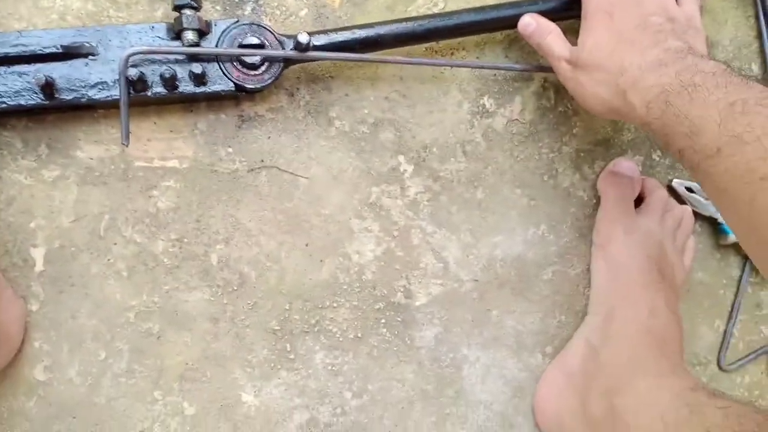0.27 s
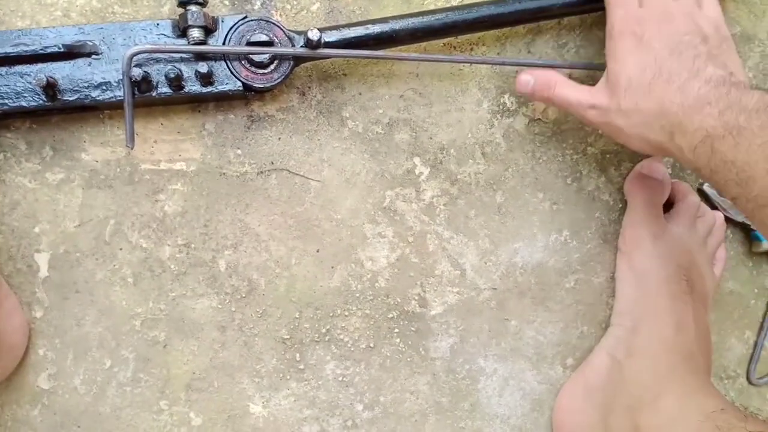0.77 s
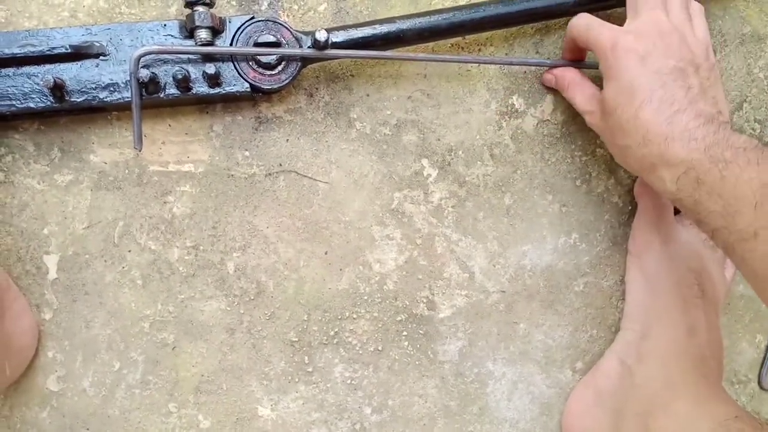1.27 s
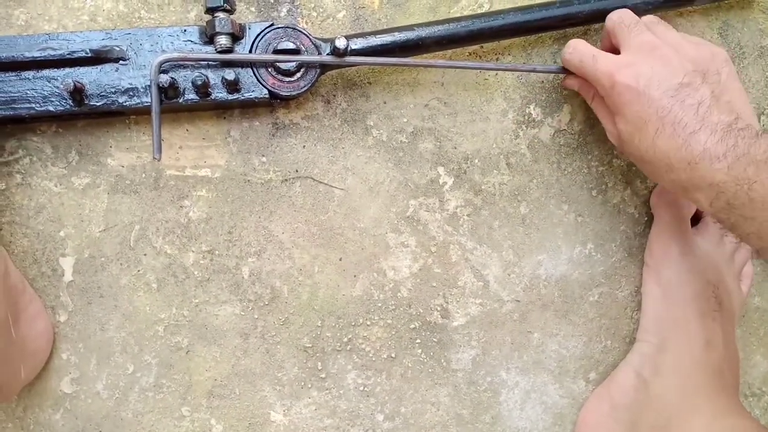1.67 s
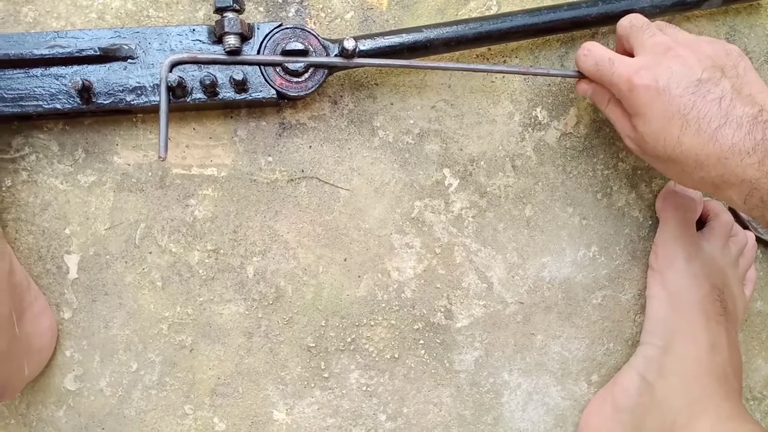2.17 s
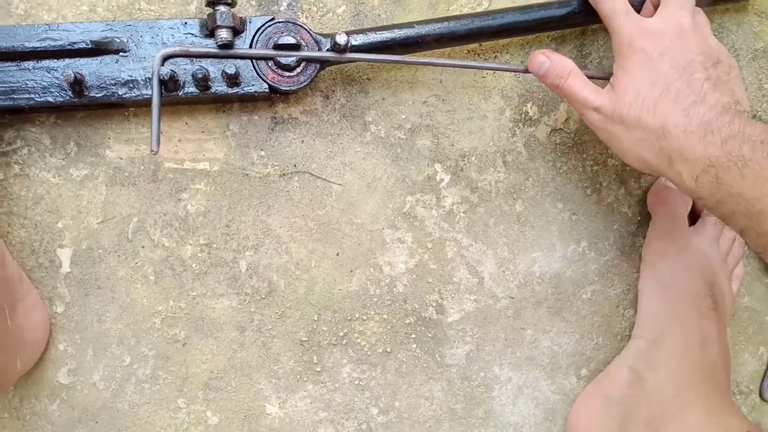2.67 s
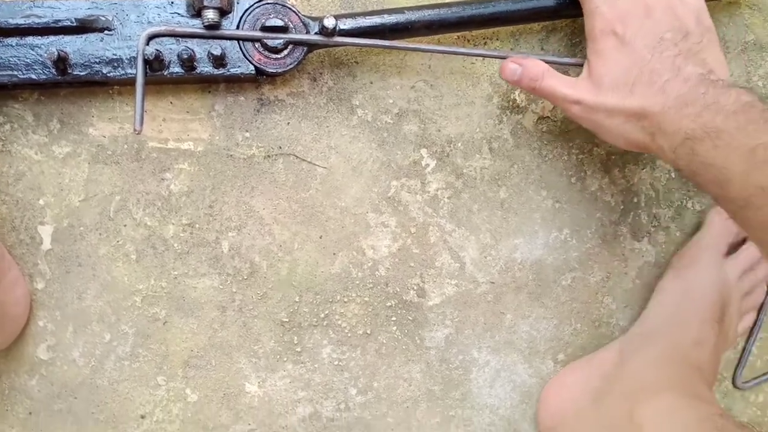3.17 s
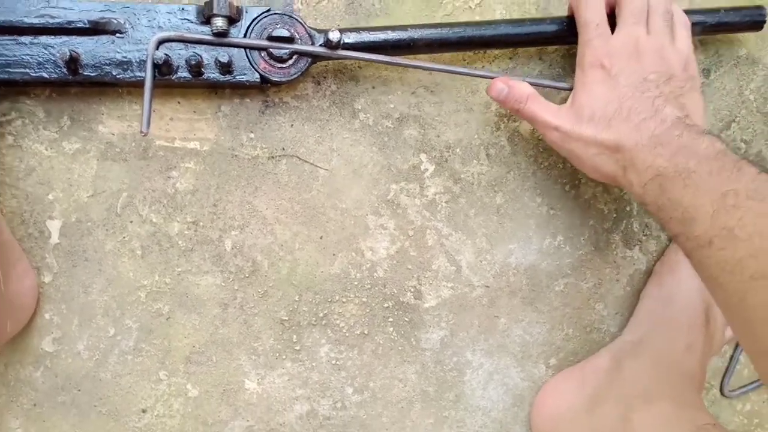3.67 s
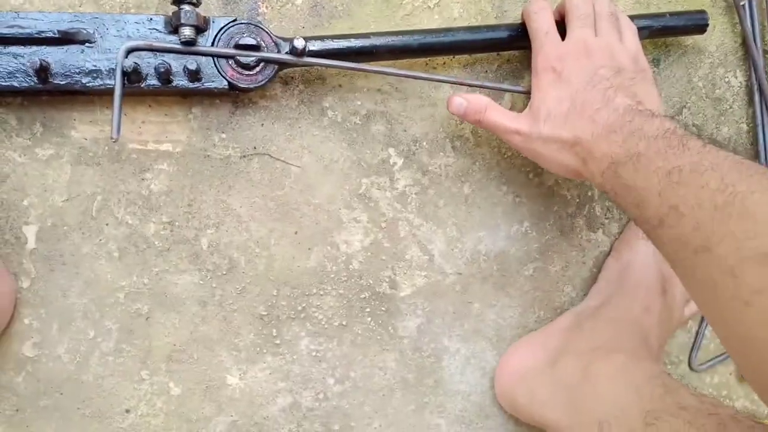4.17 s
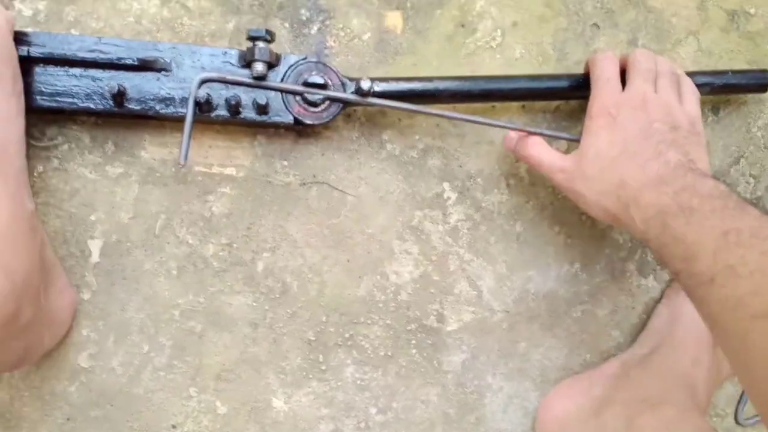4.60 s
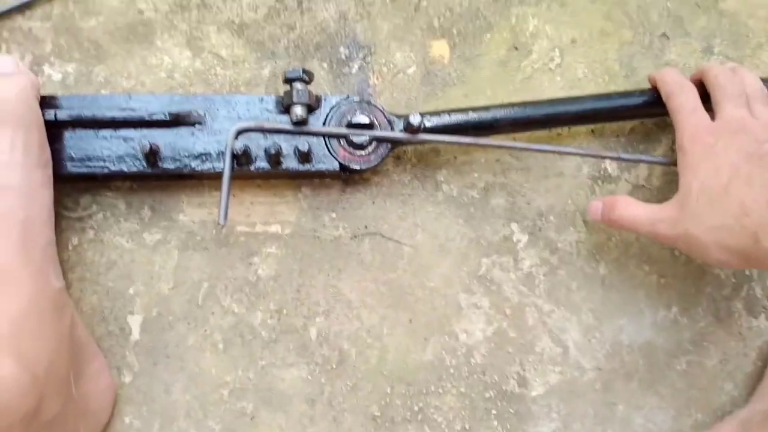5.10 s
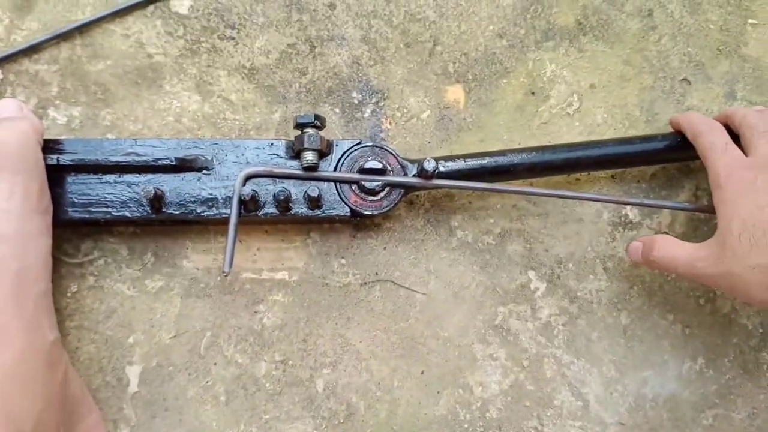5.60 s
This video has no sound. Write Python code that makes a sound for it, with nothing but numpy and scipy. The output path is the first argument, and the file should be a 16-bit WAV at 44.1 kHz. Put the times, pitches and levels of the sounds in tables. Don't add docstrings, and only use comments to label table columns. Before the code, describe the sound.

A thin steel rod knocks and rattles in a heavy metal bending jig, with one loud clang, gritty scuffs and a brief squeak.

```python
import sys
import numpy as np
from scipy import signal
from scipy.fft import rfft, irfft, next_fast_len
from scipy.io import wavfile
from scipy.ndimage import uniform_filter1d

SR = 44100
rng = np.random.default_rng(int(sys.argv[2]) if len(sys.argv) > 2 else 0)


def boost_factor(decibels):
    exponent = np.asarray(decibels, float) / 20
    return 10 ** exponent


def waveform_to_disk(signal):
    frames = np.transpose(np.atleast_2d(signal))
    scaled = np.clip(frames, -1, 1) * 32767
    samples = np.round(scaled).astype(np.int16)
    wavfile.write(sys.argv[1], SR, samples)


N = 257746
T = np.arange(N) / SR


def rms_one(x):
    return x / np.sqrt(np.mean(x ** 2) + 1e-20)


def at_hz(points, hz):
    points_hz, values = np.transpose(points)
    return np.interp(np.log(hz), np.log(points_hz), values)


def coloured(x, spectrum):
    size = next_fast_len(len(x))
    hz = np.fft.rfftfreq(size, 1 / SR) + 1
    shaped = rfft(x, size) * boost_factor(at_hz(spectrum, hz))
    return rms_one(irfft(shaped, size)[:len(x)])


def drift(rate):
    r = np.exp(-80 * np.pi * rate / SR)
    noise = rng.standard_normal(N // 40 + 2002)
    slow = signal.lfilter([1], [1, -2 * r, r * r], noise)[2000:]
    return np.interp(np.arange(N) / 40, np.arange(len(slow)), rms_one(slow))


def glide(hz):
    return 2 * np.pi * np.cumsum(hz) / SR


def air(patchy_db=.4):
    # frequency in Hz, level in dB per Hz.
    murmur_colour = [(15, -43), (25, -18.5), (43, -17.5), (79, -9), (133, -3), (191, -7.5), (439, -10.5),
                     (526, -12.5), (602, -14), (826, -13), (1060, -16), (3830, -22), (5500, -35.5),
                     (7150, -68), (12100, -120)]
    # frequency in Hz, level in dB per Hz.
    hiss_colour = [(2940, -32), (5000, -11.5), (5580, -8.5), (5850, -4.5), (7230, -8), (8380, 2.5),
                   (10900, -10.5), (11800, -9), (15500, -10.5)]
    murmur = coloured(rng.standard_normal(N), murmur_colour)
    hiss = coloured(rng.standard_normal(N), hiss_colour)
    murmur_gain = boost_factor(-60.5 - 4.0 + patchy_db * drift(1.0))
    return murmur_gain * murmur + boost_factor(-77.5 + patchy_db * drift(2.6)) * hiss


def hum(waver_hz=1.22, waver_db=2.2):
    # frequency in Hz, level in dB rms.
    motor_lines = [(96.9, -68.5), (145.3, -69), (339.1, -87), (532.9, -67.5), (721.4, -77), (769.8, -77.5),
                   (818.3, -75.5), (866.7, -79), (915.2, -87)]
    out = np.zeros(N)
    for hz, db in motor_lines:
        gain = np.sqrt(2) * boost_factor(db + waver_db * drift(2.7))
        out += gain * np.sin(glide(hz + waver_hz * drift(4)))
    return out


def insect(buzz_hz=3, throb_db=1.5, beats_per_s=58, beat_depth=1.2):
    # centre in seconds, half width in seconds, level in dB rms.
    swells = [
        (.6, .8, -87.5),
        (2.4, 1, -85.5),
        (4.95, .35, -86),
        (5.7, .3, -89),
    ]
    swell = sum(boost_factor(db) * np.exp(-((T - s) / width) ** 2) for s, width, db in swells)
    beats = 1 + beat_depth * np.cos(2 * np.pi * beats_per_s * T)
    hz = 4490 + 11 * T + buzz_hz * drift(6)
    return np.sqrt(2) * swell * beats * boost_factor(throb_db * drift(8)) * np.sin(glide(hz))


def bird(start_s=5.715, top_s=5.787, top_hz=10570, bend_hz_per_s2=340000, under_db=-5):
    hz = np.maximum(top_hz - bend_hz_per_s2 * (T - top_s) ** 2, 0)
    upper_voice = np.sin(glide(hz))
    lower_voice = boost_factor(under_db + 3 * drift(30)) * np.sin(glide(.905 * hz))
    gain = boost_factor(-84.5 + 3 * drift(25)) * np.clip((T - start_s) / .01, 0, 1)
    return np.sqrt(2) * gain * (upper_voice + lower_voice)


def room(x, tail_db=-5, build_s=0.014):
    # delay in seconds, level in dB.
    echoes = [(.0125, -5), (.021, -7), (.031, -10), (.043, -11), (.061, -13)]
    # frequency in Hz, t60 in seconds.
    decay = [(200, 0.75), (1000, 0.5), (3000, 0.66), (6000, 0.45), (9500, 0.62), (12500, 0.16),
             (15000, 0.16)]
    t, tail = np.arange(SR) / SR, 0
    edges = 100 * 2 ** np.arange(0, 7.6, .5)
    for low, high in zip(edges, edges[1:]):
        band_pass = signal.butter(2, [low, high], "band", fs=SR, output="sos")
        band = signal.sosfilt(band_pass, rng.standard_normal(SR))
        tail = tail + band * boost_factor(-60 * t / at_hz(decay, np.sqrt(low * high)))
    tail = tail * (1 - np.exp(-t / build_s))
    response = boost_factor(tail_db) * tail / np.sqrt(np.sum(tail ** 2))
    for delay, db in echoes:
        response[round(delay * SR)] += boost_factor(db)
    return signal.fftconvolve(x, response)[:N]


def stroke(s, length, db):
    rise_share, fade_db = 0.25, 28
    away = np.maximum((s - T) / rise_share, (T - s) / (1 - rise_share)) / length
    return boost_factor(db - fade_db * np.minimum(away, 5))


def scuffs(flicker_db=-2.5):
    # loudest moment in seconds, length in seconds, rasp level in dB,
    # dry hiss over rasp in dB, weight as rumble over rasp in dB.
    slides = [(0.015, 0.33, -59, 3.5, -6), (0.18, 0.14, -75, 6, -15), (0.841, 0.14, -74.5, 6, -4),
              (1.113, 0.54, -83.5, 8, 8), (1.64, 0.85, -79, 1, -1), (1.89, 0.11, -59.5, -14, -11),
              (2.266, 0.13, -65, -1, -7), (2.633, 0.3, -68, -3.5, -4.5), (2.836, 0.17, -74.5, 2, -15),
              (3.036, 0.55, -66.5, 5, -4.5), (4, 0.28, -78.5, -26, 15.5), (4.086, 0.46, -69, 0.5, 7.5),
              (5.547, 0.2, -79.5, -15, 19), (5.643, .2, -82.5, -11.5, 20)]
    drags = [(1.98, 0.041, -46, -15, -14), (2.0, 0.22, -56, -30, 6.5), (3.155, 0.1, -72.5, 6, -7),
             (3.189, 0.097, -56.5, 11, 1.5), (3.25, 0.4, -63.5, 2, -3.5), (3.335, 0.2, -64.5, 14, -2),
             (3.472, 0.13, -46, -4.5, -3.5), (3.71, 0.075, -69, 6.5, 11), (3.758, 0.19, -41.5, -8.5, -6),
             (3.789, 0.05, -48.5, -3, 2.5), (3.85, 0.14, -70, -23, 11), (4.443, 0.08, -44.5, 6, -7.5),
             (4.465, 0.043, -52.5, -0.5, -3)]
    # frequency in Hz, level in dB per Hz.
    hiss = [(3500, -40), (5000, -15), (6200, -12), (7500, -7), (8800, 0), (10000, -6), (11500, -15),
            (15500, -20)]
    rasp = [(600, -28.5), (950, -10.5), (1400, -0.5), (1800, -4), (2600, -7.5), (3300, -4.5), (4500, -12.5),
            (6000, -39)]
    rumble = [(120, -17.5), (220, 0.5), (350, 5), (700, 0), (1000, -2), (1400, -42.5)]
    sizes = boost_factor(3.5 * np.minimum(rng.exponential(1, N), 3.5)) * rng.choice([-1, 1], N)
    grains = (rng.random(N) < 2000 / SR) * sizes
    grit = rms_one(grains) + .6 * rng.standard_normal(N)
    levels = np.zeros((3, N))
    for s, length, db, dry_db, weight_db in [*slides, *drags]:
        balance = boost_factor([[dry_db], [0], [weight_db]])
        levels += balance * stroke(s, length, db)
    out = np.zeros(N)
    for level, colour in zip(levels, (hiss, rasp, rumble)):
        out += uniform_filter1d(level, size=150) * coloured(grit, colour)
    return boost_factor(-2.0 + flicker_db * drift(30)) * out


def brush():
    # loudest moment in seconds, length in seconds, level in dB.
    whisks = [
        (.85, .1, -72),
        (2.267, .12, -65),
    ]
    # frequency in Hz, level in dB per Hz.
    whisk_colour = [(9000, -30), (11500, -8), (14000, -8), (15800, -4)]
    gain = sum(stroke(*row) for row in whisks)
    return gain * coloured(rng.standard_normal(N), whisk_colour)


def squeak(jitter=0.0014):
    # time in seconds, level in dB.
    pressure = [
        (4.426, -58),
        (4.433, -21),
        (4.4375, -14),
        (4.441, -22),
        (4.444, -9),
        (4.448, -6.5),
        (4.452, -9),
        (4.455, -22),
        (4.459, -55),
    ]
    # multiple of the slip rate, level in dB.
    overtone_levels = [(2, -6.5), (3, -6), (4, -29.5), (5, -47.5)]
    slip_s, slip_glide_s = 4.4398, .003
    grip_hz, slid_hz = 3255, 3130
    gain = boost_factor(np.interp(T, *np.transpose(pressure), left=-130, right=-130))
    hz = slid_hz + (grip_hz - slid_hz) * (1 - np.tanh((T - slip_s) / slip_glide_s)) / 2
    harsh_db = 6.5 - np.maximum(2499 * (slip_s - T), 1500.5 * (T - slip_s))
    phase = glide(hz * (1 + jitter * drift(300)))
    overtones = sum(boost_factor(db + harsh_db) * np.sin(round(k) * phase) for k, db in overtone_levels)
    return gain * np.sin(phase), gain * overtones


def heel_plate(struck_s=4.4495, enter_s=4.4545, fade_in_s=0.003):
    # frequency in Hz, level in dB, t60 in seconds.
    plate_modes = [(3087, -19, 0.54), (3097, -25.5, 0.33), (3175, -29.5, .5), (3198, -19, 0.42),
                   (3249, -25.5, .55), (3300, -32, .4)]
    t = np.maximum(T - struck_s, 0)
    rings = sum(boost_factor(db - 60 * t / t60) * np.sin(2 * np.pi * hz * t) for hz, db, t60 in plate_modes)
    return rings * np.clip((T - enter_s) / fade_in_s, 0, 1)


def ticks(attack_s=.0015):
    # start in seconds, peak level in dB, frequency in Hz, t60 in seconds.
    creeps = [(3.164, -55, 3040, 0.041), (3.169, -55, 3650, .05), (3.186, -55, 1405, 0.032),
              (3.200, -52, 1300, .03), (3.207, -46, 1116, 0.045), (3.214, -50, 1650, 0.037),
              (3.234, -51, 1060, 0.032), (3.235, -60, 1820, 0.035), (3.246, -56, 1090, 0.046),
              (3.247, -60.5, 3650, 0.072), (3.285, -45, 3490, 0.074), (3.294, -44, 3260, 0.065),
              (3.303, -49, 1070, 0.033), (3.302, -51, 1520, 0.037), (3.334, -44.5, 1140, 0.031),
              (3.42, -47, 1395, 0.065), (3.423, -52, 1950, 0.059), (3.423, -52.5, 930, 0.094),
              (3.424, -51, 3780, 0.046), (3.703, -47.5, 1350, 0.057), (3.727, -47, 1250, 0.037),
              (3.739, -48, 3300, .08), (3.744, -38, 1235, .06), (3.751, -43, 3300, 0.073),
              (3.757, -39, 2080, 0.041), (3.785, -29.5, 1400, 0.085)]
    out, t = np.zeros(N + SR), np.arange(SR // 5) / SR
    for s, db, hz, t60 in creeps:
        gain = boost_factor(db - 60 * t / t60) * np.minimum(t / attack_s, 1)
        out[round(s * SR):][:len(t)] += gain * np.sin(2 * np.pi * hz * t)
    return out[:N]


def knocks(hits, modes, crack_db, crack_t60, split_hz=14, twin_db=-4, knee_hz=0, held_s=1, alternate_signs=False):
    # frequency in Hz, level in dB per Hz.
    crack_colour = [(150, -70), (300, -16), (500, -17), (1300, 2), (3500, 0), (6000, -19.5), (8800, 4.5),
                    (12000, -18.5), (15500, -25)]
    out, t = np.zeros(N + SR), np.arange(SR // 3) / SR
    hz, level_db, t60 = np.transpose(modes)[:, :, None]
    sides = (-1.) ** np.arange(len(hz))[:, None] if alternate_signs else 1
    for s, peak_db, hardness, ring in hits:
        tilt_db = hardness * np.log2(np.maximum(hz, knee_hz) / 2000)
        strength = boost_factor(level_db + tilt_db + 1.5 * rng.standard_normal(hz.shape))
        twin_hz = hz + split_hz * np.sqrt(hz / 2000) * rng.standard_normal(hz.shape)
        pair = np.sin(2 * np.pi * hz * t) + boost_factor(twin_db) * np.sin(2 * np.pi * twin_hz * t)
        decay = boost_factor(-60 * t / (np.minimum(t60, .5) * ring))
        rings = (strength * decay * pair * sides).sum(axis=0)
        rings = rings * boost_factor(-500 * np.clip(t - held_s, 0, .03))
        colour = [(f, db + hardness * np.log2(max(f, 600, knee_hz) / 2000)) for f, db in crack_colour]
        crack = coloured(rng.standard_normal(len(t)), colour) * boost_factor(crack_db - 60 * t / crack_t60)
        blow = (rings / np.abs(rings).max() + crack) * np.minimum(t / 0.0009, 1)
        out[round(s * SR):][:len(t)] += boost_factor(peak_db + 0.5) * blow
    return out[:N]




def taps():
    tap_hits = [
        (1.04, -51, -10, 0.62),
        (1.386, -31, -9.5, 0.63),
        (1.403, -35, -19, 0.58),
        (1.441, -43, -7, 0.73),
        (1.893, -60, 4, 0.3),
        (2.657, -51, -2, 0.91),
    ]
    tap_modes = [(1110, -9, .2), (1330, -2, .06), (1385, 2, .15), (1480, -3, .07), (1640, -13, .2),
                 (1930, -9, .15), (2210, -8, .15), (2450, -12, .05), (2790, -15, .15), (3700, -18, .05),
                 (5200, -11, .08), (5900, -17, .05), (8500, -24, .05)]
    return knocks(tap_hits, tap_modes, crack_db=-21.0, crack_t60=0.095, knee_hz=3000)


def nudge():
    nudge_hits = [
        (1.508, -23, 0, 0.63),
        (1.515, -28, 0, 0.41),
    ]
    nudge_modes = [(870, -18, 0.18), (1120, -16, 0.24), (1370, -8, 0.066), (1400, 3.5, 0.095),
                   (1493, 1, 0.29), (1627, -5.5, .25), (1930, -10, 0.1), (2213, -7, 0.19),
                   (2520, -16, 0.33), (2710, -12, 0.19), (2840, -14, .14), (3090, -19, .08),
                   (3413, -12.5, 0.1), (3930, -13, .11), (4070, -20, 0.065), (4530, -26, .1),
                   (5050, -23, .08), (5450, -25, .12), (6767, -27, .1), (8700, -32, .1)]
    return knocks(nudge_hits, nudge_modes, crack_db=-32.5, crack_t60=0.022, twin_db=-6)


def tip():
    tip_hits = [
        (3.1645, -49, -1, 0.39),
        (3.1878, -41, -1, 0.88),
        (3.207, -44, -1, 0.72),
    ]
    tip_modes = [(7397, -24, 5.0), (8048, -31, 5.0), (8600, 1, 0.33), (8700, 9, 0.11), (10130, -14, 0.13),
                 (10400, -13, 0.12), (11890, -24, 0.27), (13310, -46, 5.0), (14320, -17, 0.17),
                 (14670, -37, 5.0)]
    return knocks(tip_hits, tip_modes, crack_db=-18.0, crack_t60=0.029)


def frame():
    frame_hits = [
        (3.279, -26, 10, 0.6),
        (3.467, -20.5, -1.5, 0.54),
        (3.487, -36, -15, 0.87),
        (3.511, -43, 8, 0.67),
    ]
    frame_modes = [(930, -8, .06), (1150, -9, .05), (1330, -2, .05), (1430, 0, .07), (1560, -5, .05),
                   (1950, -5, .05), (2200, -10, .05), (2800, -9, .06), (3300, -10, .1), (3780, -4, .045),
                   (8200, -18, .1), (8800, -14, .1), (9700, -20, .07)]
    return knocks(frame_hits, frame_modes, crack_db=-24, crack_t60=0.03)


def seat():
    seat_hits = [
        (3.745, -41.5, -0.34, 0.75),
        (3.7575, -33.5, -0.24, 0.62),
        (3.769, -34.5, -2.6, 1),
        (3.776, -39.5, -2, 0.4),
        (3.785, -31.5, -1, 0.42),
        (3.791, -29.5, -1, 0.61),
        (3.807, -33, -1.4, 1),
    ]
    seat_modes = [(500, -10, .06), (1180, -7, .06), (1330, 2, .08), (1400, 4, .18), (1500, -6, .06),
                  (1720, -12, .2), (2060, -5, .05), (2450, -13, .1), (2750, -15, .12), (3130, -10, .35),
                  (3240, -4, .45), (3330, -5, .3), (3850, -10, .25), (4340, -17, .2), (8240, -18, .15),
                  (8700, -16, .15), (9050, -13, .15), (9800, -21, .12)]
    return knocks(seat_hits, seat_modes, crack_db=-19, crack_t60=0.047, alternate_signs=True)


def handle():
    handle_hits = [
        (2.003, -9, 1, 0.68),
    ]
    handle_modes = [(856, -15, .2), (1312, -1, .2), (1350, 2, .07), (1463, -9, .25), (1544, -4, .25),
                    (1562, -8, .25), (2291, -11, .2), (1950, -14, .15), (1389, -4, .3), (1486, 1, .38),
                    (1637, -3, .33), (2180, -5, .18), (2207, -11, .25), (2649, -7, .17), (2681, -4, .24),
                    (2977, -15, .28), (3402, -3, .12), (3410, -13, .3), (3989, -12, .25), (4124, -18, .3),
                    (5050, -26, .4), (4640, -22, .15), (5303, -26, .08), (6150, -30, .2), (6500, -29, .2),
                    (6998, -21, .15), (8400, -16, .2), (9300, -14, .2), (9650, -16, .2), (7294, -27, .4),
                    (7892, -23, .4), (8527, -10, .4), (8635, -16, .33), (8861, -8, .19), (9065, -11, .25),
                    (9189, -15, .35), (9518, -8, .2), (10140, -28, .4), (10700, -20, .2), (12020, -32, .3),
                    (13250, -35, .3)]
    return knocks(handle_hits, handle_modes, crack_db=-13.5, crack_t60=0.052, knee_hz=3450,
                  split_hz=7.9, twin_db=3, held_s=.117)


def rod():
    rod_hits = [
        (3.279, -31, 1, 0.29),
        (3.2855, -22, 3.5, 0.25),
        (3.2915, -21, 2, 0.2),
        (3.298, -31.5, 2, .4),
        (3.312, -31, -1, 0.48),
        (3.360, -40.5, -1.5, 0.97),
    ]
    rod_modes = [(2536, -21, .2), (3250, -14, .06), (3620, -9, .07), (4000, -27, .1), (4930, -24, .4),
                 (5469, -17, .5), (5900, -20, .15), (6525, -13, .33), (6896, -7, .09), (7698, -18, .35),
                 (8086, -13, .5), (8301, -14, .2), (8430, -5, .2), (8915, -9, .3), (9302, -13, .4),
                 (9868, -16, .2), (10240, -10, .38), (10550, -10, .22), (10870, -22, .25), (11330, -24, .4),
                 (11620, -10, .19), (11910, -18, .25), (12860, -7, .1), (13110, -2, .17), (13350, -14, .16),
                 (14380, -19, .14), (14660, -13, .19), (14820, -9, .11)]
    return knocks(rod_hits, rod_modes, crack_db=-27.0, crack_t60=0.022, twin_db=-5, alternate_signs=True)


def scene():
    background = air() + hum() + insect() + bird()
    skin = scuffs() + brush()
    note, overtones = squeak()
    steel = ticks() + taps() + nudge() + tip() + frame() + seat() + handle() + rod()
    room_send = boost_factor(-9.5) * steel + boost_factor(-9.0) * skin + boost_factor(-6.5) * note + boost_factor(-3.5) * overtones
    close = steel + skin + note + overtones + heel_plate()
    return (close + room(room_send) + background)[None]


def low_pass(x):
    return signal.sosfilt(signal.butter(12, 15960, fs=SR, output="sos"), x)


def record(dry):
    top_cut = signal.cheby2(16, 50, 16000, fs=SR, output="sos")
    mix = signal.sosfilt(top_cut, dry)
    return low_pass(mix)


dry = scene()
out = record(dry)
waveform_to_disk(out)
```